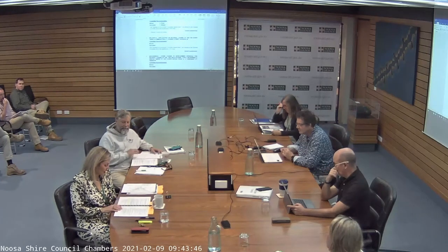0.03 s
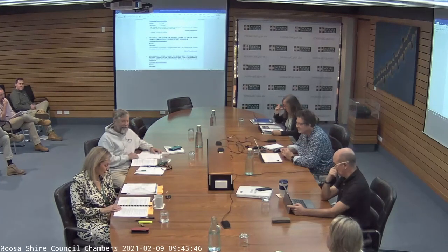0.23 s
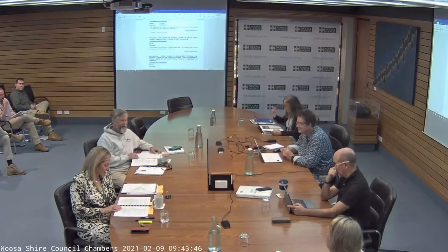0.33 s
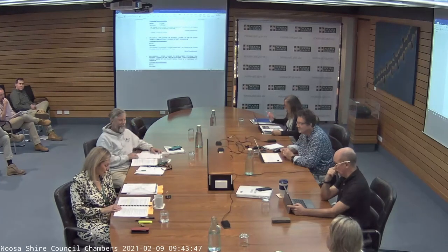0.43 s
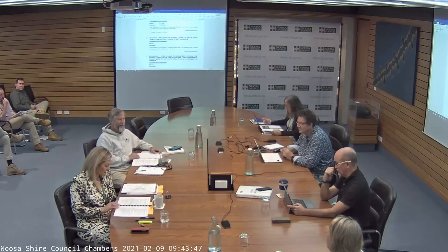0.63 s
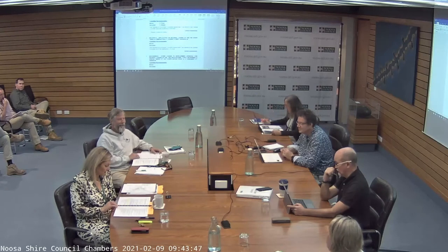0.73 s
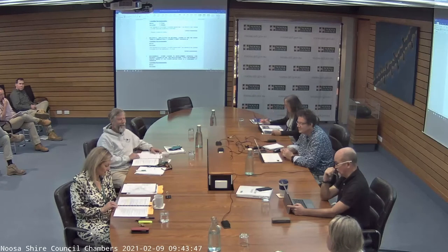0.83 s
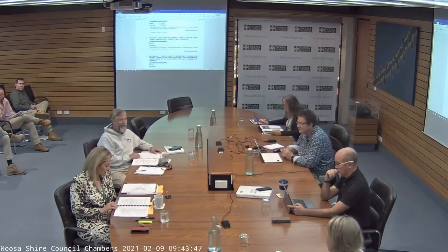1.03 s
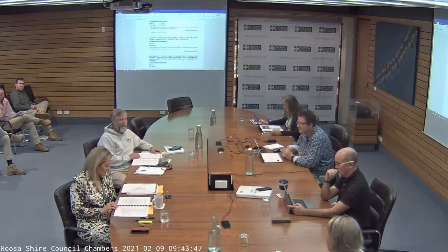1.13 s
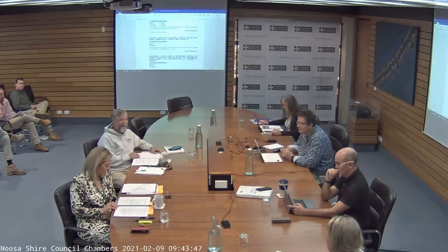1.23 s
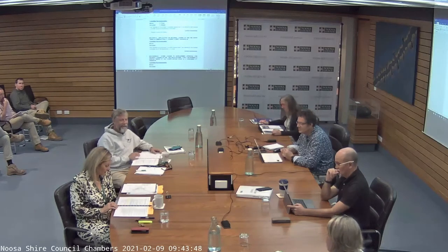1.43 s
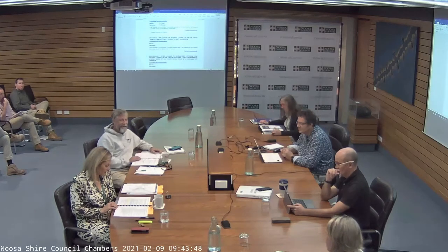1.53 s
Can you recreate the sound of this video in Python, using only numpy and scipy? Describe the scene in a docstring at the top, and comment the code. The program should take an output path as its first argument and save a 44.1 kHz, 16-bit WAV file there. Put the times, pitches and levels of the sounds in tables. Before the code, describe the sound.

Paper handling on a wooden table, close to the microphone. A stack scuffs dully with soft air puffs at the start; a sheet snaps loudly at 0.2 seconds and flops down by 0.35. After a short lull, crisp brushes and a page slide run from 0.65 to 1.1. Light scuffing and a tap come near 1.4, then a corner flick and soft thump around 1.55. Short room echoes, low ventilation rumble.

```python
"""Papers are handled on a wooden table in a meeting room, over the steady rumble of the ventilation.
A stack scuffs dully over the wood amid soft puffs of air and light brushes; a sheet snaps taut, flops
down and is tapped; a page slides over its neighbour; late on, a stiff corner flicks free. Cracks are
filtered click clusters, rubbing is grainy friction noise, puffs and room tone are coloured noise.
Table and walls return distinct echoes and a short tail to all the paper sounds."""
import sys
import numpy as np
from scipy import signal
from scipy.fft import rfft, irfft
from scipy.io import wavfile

SR = 44100
rng = np.random.default_rng(int(sys.argv[2]) if len(sys.argv) > 2 else 0)


def master(y):
    """Save y as 16-bit WAV."""
    cut = np.clip(np.atleast_2d(y).T, -1, 1)
    pcm = np.round(cut * 32767)  # scale
    wavfile.write(sys.argv[1], SR, pcm.astype(np.int16))


N = 70560
T = np.arange(N) / SR


def from_db(db):
    """Level to amplitude: 20 dB is a factor of ten."""
    return 10 ** (np.asarray(db) / 20)


def rms_one(x):
    """Normalise the mean power to one."""
    return x / np.sqrt(np.mean(x ** 2) + 1e-20)


def at_hz(points, hz):
    """Interpolate a table linearly over logarithmic frequency."""
    f, value = np.transpose(points)
    return np.interp(np.log(np.maximum(hz, 1)), np.log(f), value)


def spectral_gain(spectrum, tilt_db, hz):
    """Magnitude response: a spectrum in dB plus a constant slope per octave."""
    return from_db(at_hz(spectrum, hz) + tilt_db * np.log2(hz))


def colour(x, spectrum, tilt_db=0):
    """Linear filtering: multiply the Fourier transform by a magnitude response; rms 1."""
    hz = np.maximum(np.fft.rfftfreq(len(x), 1 / SR), 1)
    return rms_one(irfft(rfft(x) * spectral_gain(spectrum, tilt_db, hz), len(x)))


def noise(spectrum, tilt_db=0):
    """Stationary random noise: white noise shaped by a spectrum; rms 1."""
    return colour(rng.standard_normal(N), spectrum, tilt_db)


def octaves(x):
    """Filter bank: overlapping octave bands that sum to the signal, as (centre Hz, band)."""
    centres = 125 * 2. ** np.arange(8)
    log_hz = np.log(np.maximum(np.fft.rfftfreq(N, 1 / SR), 1))
    whole = rfft(x)
    bands = []
    for hz in centres:
        weight = np.interp(log_hz, np.log(centres), centres == hz)
        bands.append((hz, irfft(whole * weight, N)))
    return bands


def add(out, s, sound):
    """Superposition: mix a sound in at a time."""
    part = out[int(s * SR):][:len(sound)]
    part += sound[:len(part)]


def burst(length, release_s, spectrum, tilt_db=0):
    """Minimum-phase filtering: a cluster of micro-clicks, causally given a spectrum; unit energy."""
    t = T[:4096]
    hz = np.maximum(np.fft.rfftfreq(4096, 1 / SR), 1)
    envelope = np.exp(-np.maximum(t - length, 0) / release_s)
    clicks = rfft(rng.standard_normal(len(t)) * envelope)
    # folding the cepstrum onto positive times makes the shaping filter causal
    cepstrum = irfft(np.log(spectral_gain(spectrum, tilt_db, hz) / np.abs(clicks)))
    cepstrum[1:len(t) // 2] *= 2
    cepstrum[len(t) // 2 + 1:] = 0
    out = irfft(clicks * np.exp(rfft(cepstrum)))
    return out / np.linalg.norm(out)


def cracks(rows, spectrum, release_s):
    """Impulsive excitation: each crack is a short burst whose energy grows with its length."""
    out = np.zeros(N)
    for s, db, length, tilt_db in rows:
        gain = from_db(db) * np.sqrt(length * SR)
        add(out, s, gain * burst(length, release_s, spectrum, tilt_db))
    return out


def friction():
    """Stick-slip: fibres catch and let go in tiny clicks over a fluttering rub, finely uneven in spectrum."""
    grains_per_s, grain_spread_db = 2000, 5
    rub_share = 0.78  # smooth rub relative to the grains' rms
    flutter_db, flutter_hz = 2.5, 43  # rms depth and cutoff of the random level changes
    ripple_db, ripple_hz = 3, 89.95  # depth and spacing of a random fine ripple in the spectrum

    sizes = from_db(grain_spread_db * np.minimum(rng.exponential(1, N), 3.5))
    signs = rng.choice([-1, 1], N)
    grains = rms_one(sizes * signs * (rng.random(N) < grains_per_s / SR))
    lowpass = signal.butter(2, flutter_hz, fs=SR, output="sos")
    flutter = rms_one(signal.sosfilt(lowpass, rng.standard_normal(N)))
    rub = (grains + rub_share * rng.standard_normal(N)) * from_db(flutter_db * flutter)
    hz = np.fft.rfftfreq(N, 1 / SR)
    ripple = np.interp(hz / ripple_hz, np.arange(N), rng.standard_normal(N))
    return irfft(rfft(rub) * from_db(ripple_db * ripple), N)


def sliding(curve, spectrum):
    """Sliding friction: the level and brightness of the rub follow the hand."""
    s, db, tilt = np.transpose(curve)
    db, tilt = np.interp(T, s, db), np.interp(T, s, tilt)
    out, power = 0, 0
    for hz, band in octaves(colour(friction(), spectrum)):
        gain = from_db(tilt * np.log2(hz))
        out = out + gain * band
        power = power + gain ** 2 * np.mean(band ** 2)
    # dividing by the bands' power offsets the tilt's effect on the level
    return from_db(db) * rms_one(out / np.sqrt(power))


def room_tone():
    """Stationary broadband noise: the ventilation's low rumble and a fainter airy noise above it."""
    # spectra of rumble and air: f/Hz, relative level per Hz/dB
    rumble_spectrum = [(10, 3.5), (18, 10), (26, 0.5), (35, 3.5), (48, -12), (68, -8), (85, -17),
                       (105, -13.5), (150, -28.5), (300, -45), (1000, -82.5)]
    air_spectrum = [(100, -8), (250, 6), (500, 4.5), (1000, -15), (3000, -14.5), (7000, -27.5),
                    (10000, -27), (15000, -28.5)]
    rumble_db, air_db = -52, -77
    return from_db(rumble_db) * noise(rumble_spectrum) + from_db(air_db) * noise(air_spectrum)


def stack_scuffs():
    """Sliding friction with little treble: a stack scuffs dully over the wood."""
    # movement of the stack: t/s, level/dB, tilt/(dB per octave)
    movement = [(0, -45.5, 1.5), (.02, -53.5, -6.5), (.06, -58, -0.5), (.09, -63, -15), (.125, -74.5, 5),
                (.16, -59, 4), (.205, -55, 4), (.24, -66, 8), (.6, -90.5, -5.5), (1.1, -89, 6),
                (1.17, -69, -4), (1.25, -60.5, -3), (1.33, -68, -7), (1.4, -60, 5), (1.465, -58.5, -3.5),
                (1.53, -67.5, -8), (1.565, -54.5, 3.5), (1.6, -69, -5)]
    # spectrum of stack on wood: f/Hz, relative level per Hz/dB
    stack_spectrum = [(20, -24), (130, -16), (220, -11.5), (320, -9), (430, -0.5), (600, 1.5), (800, -1.5),
                      (1000, 3), (1400, -0.5), (2000, -10.5), (2600, -19.5), (5000, -32), (8000, -45.5),
                      (14000, -59.5)]
    return sliding(movement, stack_spectrum)


def puffs():
    """Low-frequency flow noise: moving sheets push air softly on the microphone."""
    # pushes of air: t/s of the peak, peak level/dB, Gaussian width/s
    pushes = [(0.031, -50.5, 0.084), (.33, -58, 0.072), (0.913, -51, 0.024), (1.03, -58.5, 0.078),
              (1.541, -56.5, 0.043)]
    # spectrum of the moving air: f/Hz, relative level per Hz/dB
    puff_spectrum = [(15, -8.5), (40, 1.5), (70, 4), (130, -9), (250, -24.5), (600, -70)]
    envelope = sum(from_db(db) * np.exp(-((T - s) / width) ** 2) for s, db, width in pushes)
    return noise(puff_spectrum) * envelope


def brushes():
    """Transient friction: strokes of a sheet's edge, mostly hissing, the last a low soft thump."""
    # strokes: t/s, level/dB, attack/s, release/s, tilt/(dB per octave)
    strokes = [(0.106, -53.5, 0.027, 0.012, 5), (.584, -71.5, .005, 0.039, -7.5),
               (0.657, -56, .006, 0.017, 0.5), (0.68, -50.5, 0.0021, 0.0091, -7.5),
               (0.693, -44.5, 0.0057, .011, -4), (0.723, -46, 0.0047, 0.016, -7),
               (.753, -46.5, 0.0036, 0.0034, -4), (0.781, -45.5, 0.0024, 0.0041, -4),
               (0.806, -48.5, .005, 0.033, -6), (1.291, -62, 0.015, 0.027, -9),
               (1.56, -41.5, 0.022, .08, -19)]
    # spectrum of the edge: f/Hz, relative level per Hz/dB
    edge_spectrum = [(20, -65), (500, -34.5), (2000, -19), (3500, -3), (4800, -3), (6500, 2), (9500, -2.5),
                     (12500, -14), (13500, -29.5), (15000, -45)]
    out = np.zeros(N)
    for s, db, attack, release, tilt_db in strokes:
        swell = np.clip((T - s) / attack, 0, 1)
        decay = np.exp(-np.maximum(T - s - attack, 0) / release)
        out += from_db(db) * colour(friction(), edge_spectrum, tilt_db) * swell * decay
    return out


def snaps():
    """Impulsive radiation: a sheet snaps taut or crackles."""
    # snaps and crackles: t/s, level/dB, length/s, tilt/(dB per octave)
    snap_events = [(.2131, -14, 0.0013, 1.5), (.2588, -26.5, 0.0014, 3), (.2720, -29.5, 0.00025, -3.5),
                   (.2950, -35, 0.0007, -8), (.8005, -52.5, .0004, 7), (.8655, -56, 0.0004, 3)]
    # spectrum of the sheet: f/Hz, relative level per Hz/dB
    snap_spectrum = [(120, -39), (190, -25.5), (270, -5.5), (450, -1), (700, 8.5), (1200, 5.5),
                     (1500, -5.5), (2100, 3), (3200, -0.5), (4250, 5.5), (4900, -7), (6400, -5),
                     (8300, -15), (11000, -21), (14000, -33)]
    return cracks(snap_events, snap_spectrum, release_s=0.00054)


def taps():
    """Impact: paper lands or is tapped on the table."""
    # impacts: t/s, level/dB, length/s, tilt/(dB per octave)
    impacts = [(.302, -30, 0.0021, -3.5), (.311, -42.5, .002, 0), (.326, -42.5, 0.0011, 2.5),
               (.348, -43.5, 0.0033, 8.5), (.7712, -40, 0.0015, -0.5), (1.4098, -36, .0032, 1)]
    # spectrum of paper on table: f/Hz, relative level per Hz/dB
    tap_spectrum = [(20, -74), (100, -42), (190, -23), (280, -6), (400, -3), (560, -7), (800, 1.5),
                    (1050, 7.5), (1330, -3.5), (1700, 7.5), (2400, -4.5), (3400, -6), (4900, -12),
                    (5800, -29), (7000, -23.5), (7800, -53), (14000, -60)]
    return cracks(impacts, tap_spectrum, release_s=0.00067)


def page_slide():
    """Sliding friction of light paper: a page slides over its neighbour with small crackles."""
    # movement of the page: t/s, level/dB, tilt/(dB per octave)
    movement = [(.57, -92.5, -17.5), (.6, -74.5, 0), (.655, -71, -6.5), (.68, -61.5, -3), (.705, -56, -5.5),
                (.77, -52.5, -0.8), (.83, -51.5, 2.5), (.875, -50.5, -2.8), (.93, -54.5, 1.5),
                (.99, -58.5, -1), (1.025, -56, 2.9), (1.095, -57.5, -4.5), (1.125, -64.5, -6.5),
                (1.19, -82, -9.5), (1.29, -67.5, -9), (1.34, -60.5, -0.5), (1.39, -71, -7), (1.6, -69.5, 0)]
    # spectrum of the page: f/Hz, relative level per Hz/dB
    page_spectrum = [(20, -52.5), (150, -30), (400, -17), (650, -18.5), (900, -3.5), (1400, -3), (2200, -1),
                     (2900, 3.5), (4300, 0.5), (5200, -2), (6600, -7.5), (8000, -20), (10000, -27),
                     (12000, -39), (13300, -56)]
    return sliding(movement, page_spectrum)


def flicks():
    """Impulsive elastic release: a stiff corner flicks free."""
    # releases: t/s, level/dB, length/s, tilt/(dB per octave)
    releases = [(1.5455, -50, 0.0075, -2.5)]
    # spectrum of the corner: f/Hz, relative level per Hz/dB
    corner_spectrum = [(1000, -8.5), (2900, -27), (3350, 10.5), (3900, -3.5), (5600, -7), (6700, 3),
                       (7900, -2), (8600, -24), (10800, -25), (13000, -32)]
    return cracks(releases, corner_spectrum, release_s=0.0024)


def room():
    """Impulse response: direct sound, scattered echoes, a frequency-dependent decay; unit energy."""
    # echoes of table and walls: delay t/s, level before dulling/dB relative to the direct sound
    reflections = [(.0024, 6.5), (.0097, -3.5), (0.0118, -5.5), (.0218, 1), (0.0257, -2.5), (0.0359, -6),
                   (0.0481, -4.5), (0.0612, -16)]
    # reverberation time: f/Hz, t60/s
    decay_times = [(150, 0.4), (700, 0.31), (2000, 0.37), (4000, 0.39), (8000, 0.29), (14000, .15)]
    echo_smear_s, echo_dull_hz = 0.00024, 10600
    tail_db, tail_build_s = 1, 0.012  # tail energy relative to the direct sound; build-up time

    echoes = np.zeros(N)
    for delay, db in reflections:
        add(echoes, delay, from_db(db) * burst(0, echo_smear_s, [(1, 0)]))  # flat spectrum
    echoes = signal.sosfilt(signal.butter(1, echo_dull_hz, fs=SR, output="sos"), echoes)
    tail = np.zeros(N)
    for hz, band in octaves(rng.standard_normal(N)):
        tail += band * from_db(-60 * T / at_hz(decay_times, hz))
    tail = tail * (1 - np.exp(-T / tail_build_s))
    direct = T == 0
    response = direct + echoes + from_db(tail_db) * tail / np.linalg.norm(tail)
    return response / np.linalg.norm(response)


def scene():
    """Convolution with the room: all the paper sounds reverberate; air puffs and room tone are added."""
    far = snaps() + taps() + stack_scuffs()
    near = page_slide() + brushes() + flicks()
    wet = 0.62  # share of the room in the sound of the sheets nearest the microphone
    reverberant = signal.fftconvolve(far + wet * near, room())[:N]
    paper = reverberant + (1 - wet ** 2) * near
    return (paper + puffs() + room_tone())[None]


def record(dry):
    """Band limitation: a steep low-pass cuts the top."""
    cutoff_hz = 15000
    # the filter is 60 dB down from 500 Hz above the cutoff
    lowpass = signal.cheby2(12, 60, cutoff_hz + 500, fs=SR, output="sos")
    return signal.sosfilt(lowpass, dry)


dry = scene()
out = record(dry)
master(out)
```